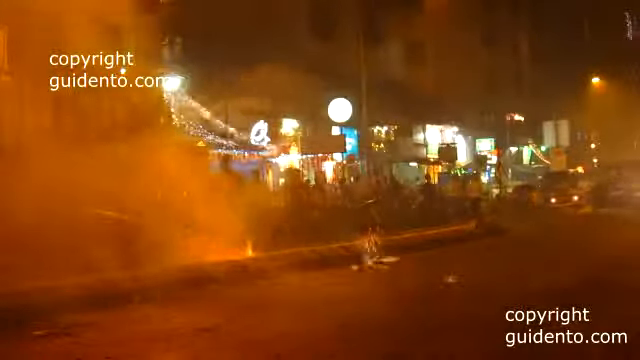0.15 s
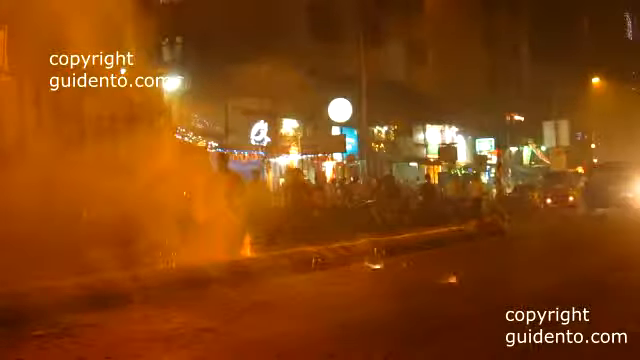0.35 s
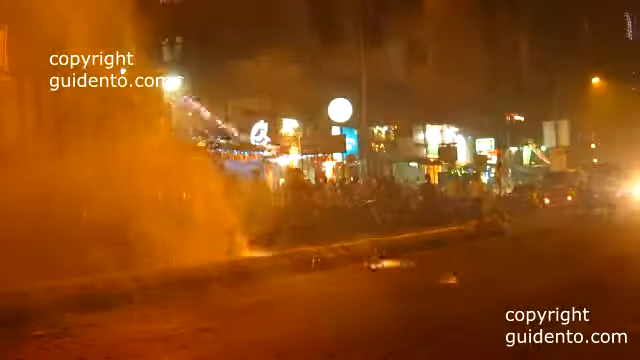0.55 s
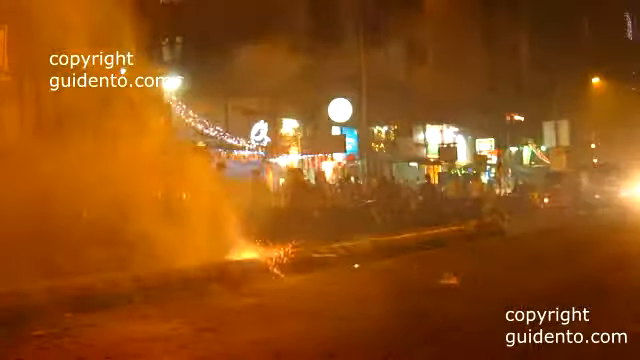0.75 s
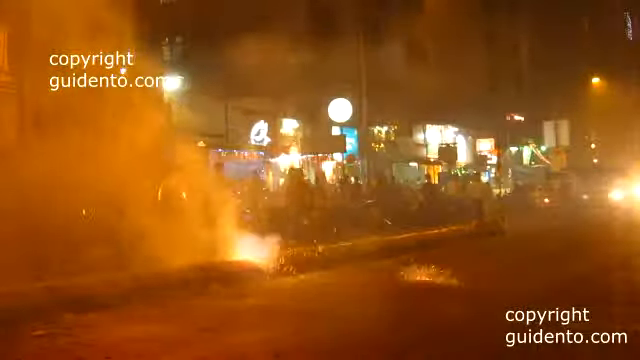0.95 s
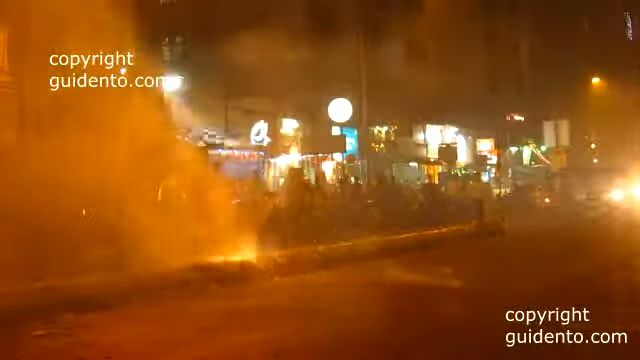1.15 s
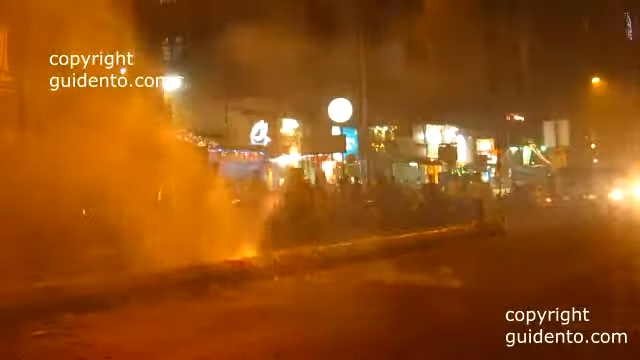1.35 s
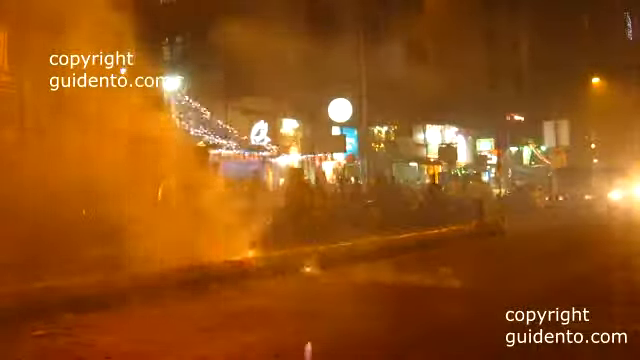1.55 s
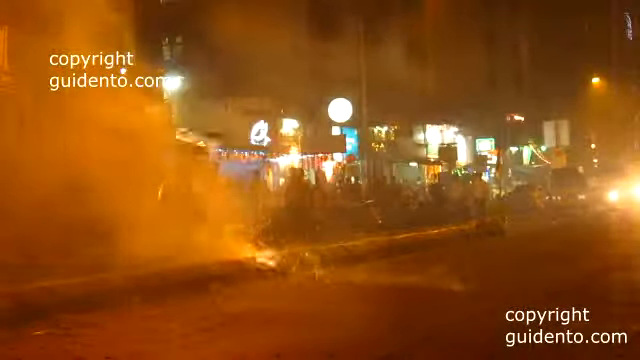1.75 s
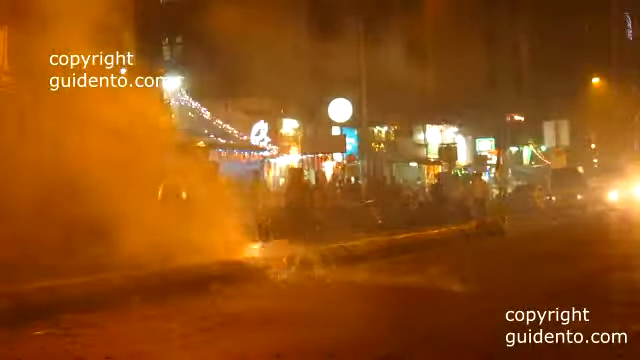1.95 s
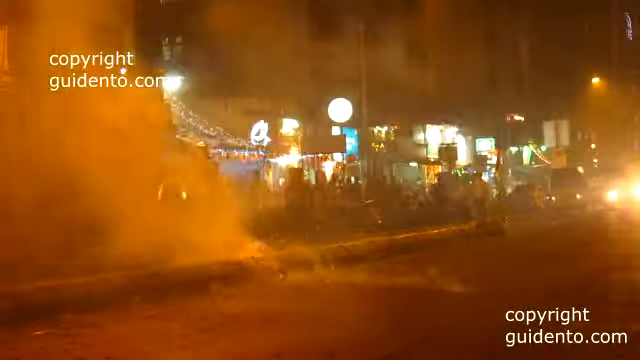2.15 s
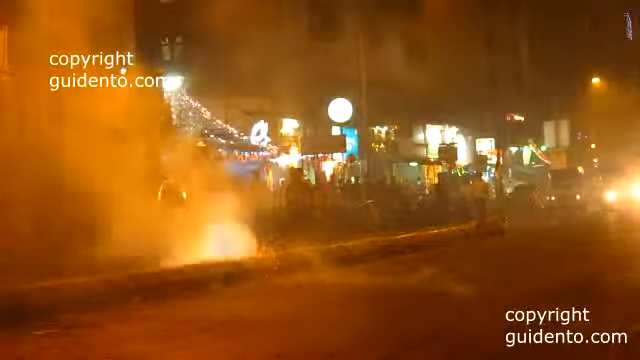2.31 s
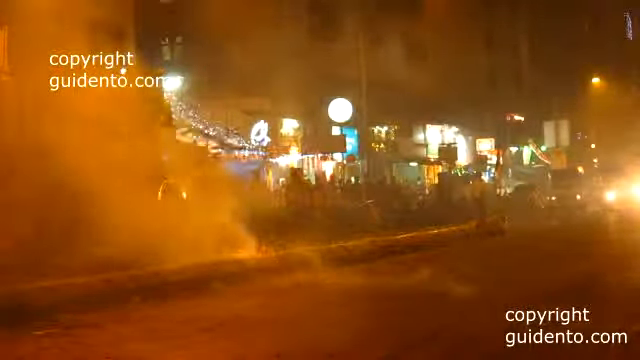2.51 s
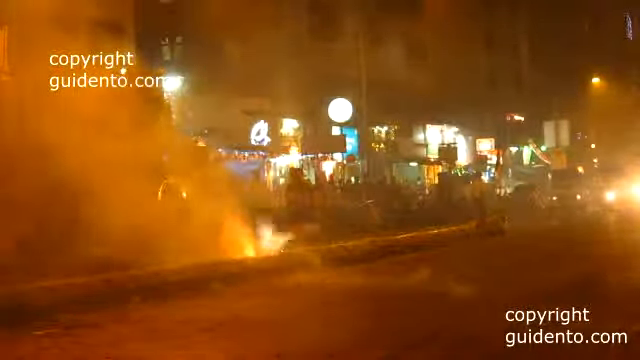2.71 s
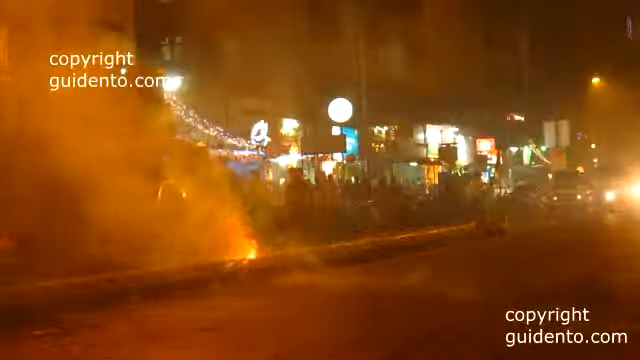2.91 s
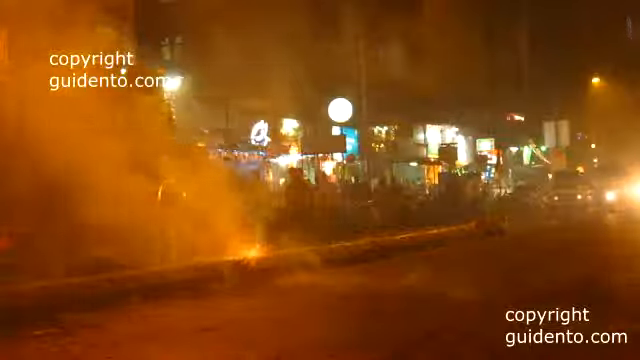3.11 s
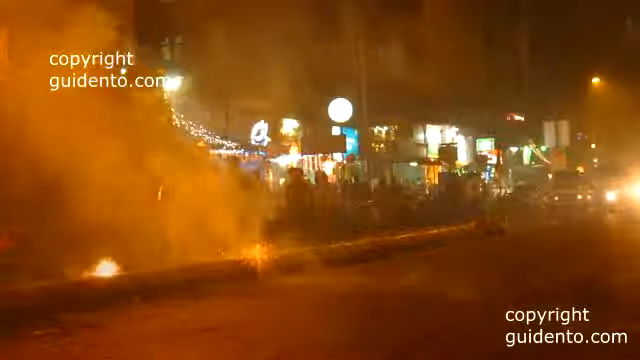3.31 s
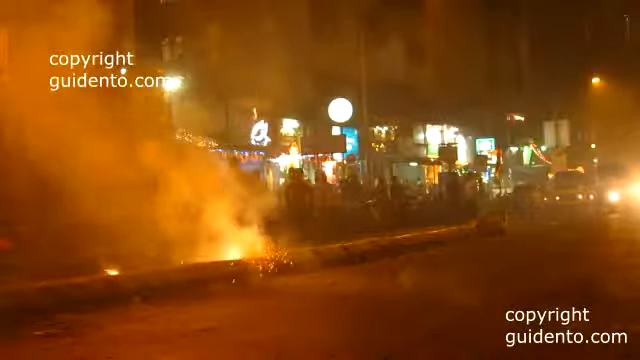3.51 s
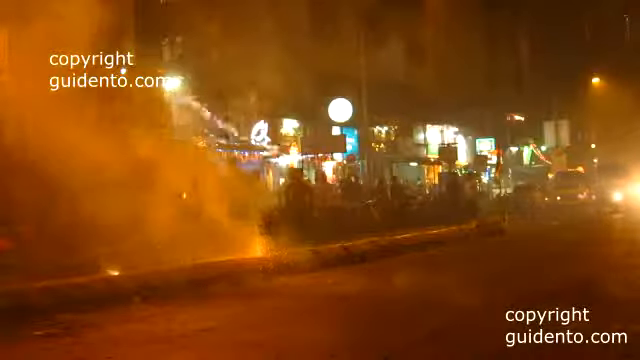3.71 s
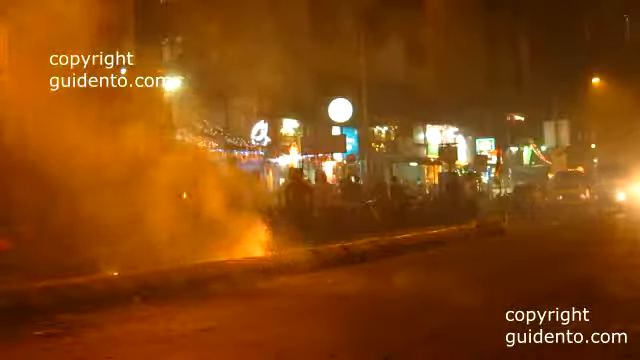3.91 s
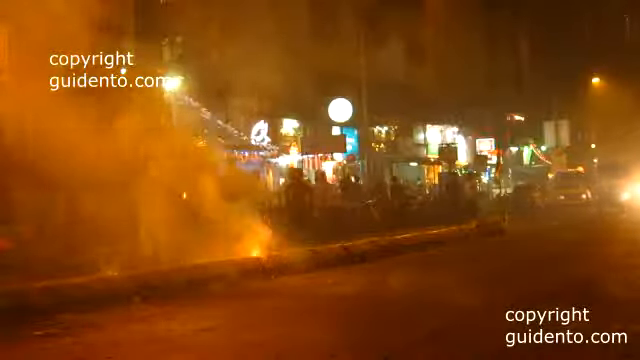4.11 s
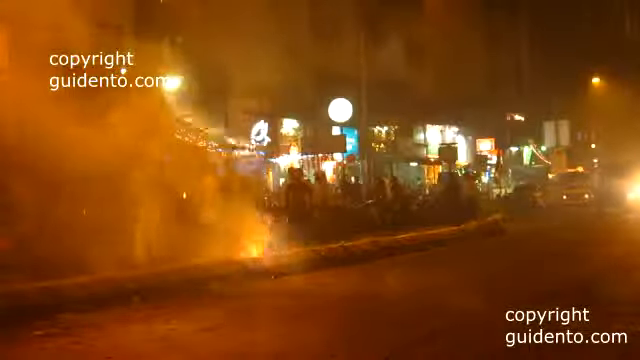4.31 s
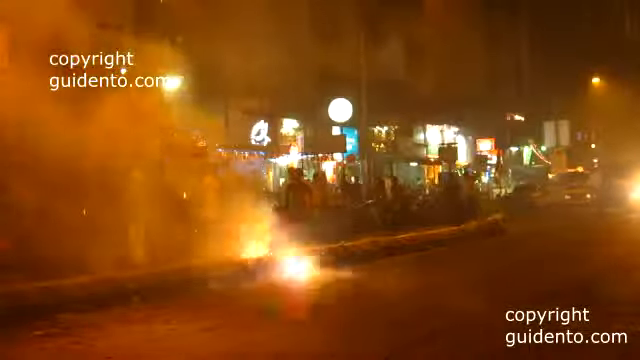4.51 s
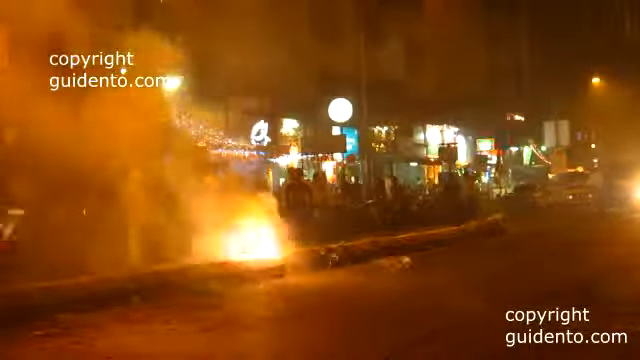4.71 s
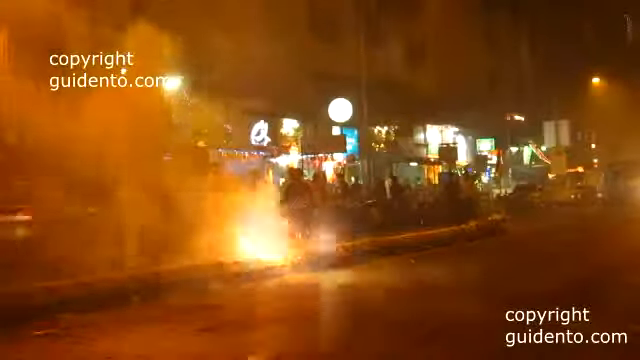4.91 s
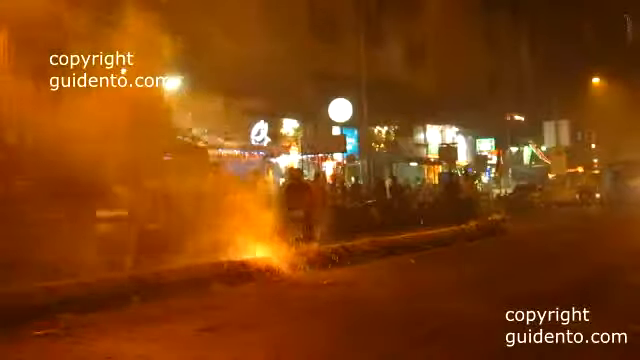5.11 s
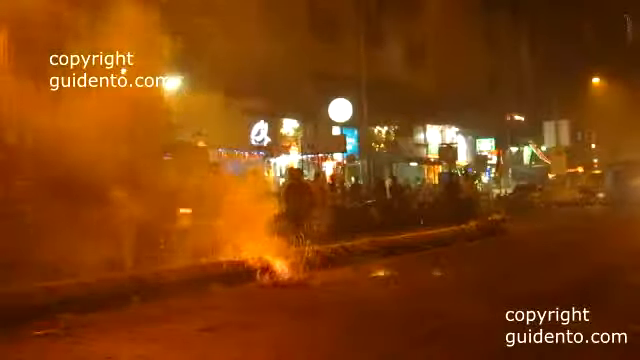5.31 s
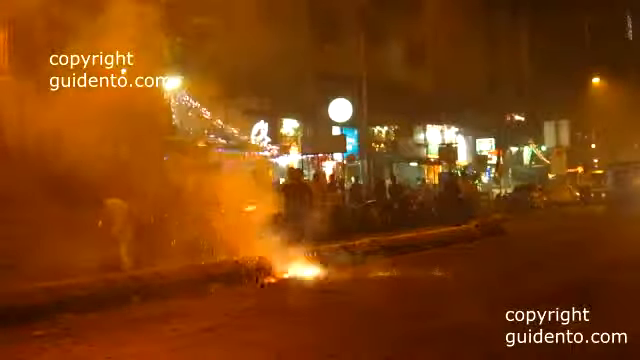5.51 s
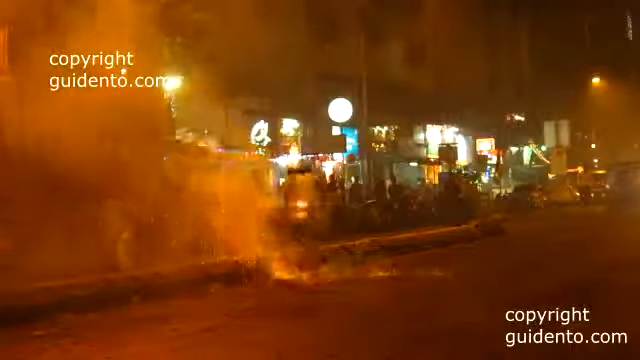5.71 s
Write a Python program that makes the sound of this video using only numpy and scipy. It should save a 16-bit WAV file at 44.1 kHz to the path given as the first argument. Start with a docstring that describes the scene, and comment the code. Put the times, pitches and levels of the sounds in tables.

```python
"""A paved street at night: a long string of firecrackers burns, its small pops merging into a rattling roar.
Bigger crackers go off among them, each a blast wave scattered by kerb and house fronts.
A low rush swells early on, and a faint hum lies underneath.
The small microphone overloads on every big bang and is dull above 3 kHz."""
import sys
import numpy as np
from scipy import signal
from scipy.fft import rfft, irfft, next_fast_len
from scipy.io import wavfile

SR = 44100
rng = np.random.default_rng(int(sys.argv[2]) if len(sys.argv) > 2 else 0)


def unload_audio(sound):
    """Save the sound as a 16-bit wav file, at the path given as the first command line argument."""
    columns = np.transpose(np.atleast_2d(sound))
    # keep every value between -1 and 1, then stretch to whole-number steps
    steps = np.round(np.clip(columns, -1, 1) * 32767)
    wavfile.write(sys.argv[1], SR, steps.astype(np.int16))


N = 253575
TIME = np.arange(N) / SR

# tone of the deep rumble: (frequency [Hz], relative level [dB])
RUMBLE_EQ = [(20, -13.5), (50, -2), (90, 3), (140, -5.5), (250, -17.5), (1000, -50)]
# tone of the low rush: (frequency [Hz], relative level [dB])
RUSH_EQ = [(25, -20.5), (55, -19), (110, -5.5), (170, -2), (260, -0.5), (430, -0.2), (600, -11),
           (1000, -8.5), (3000, -45)]
# hollow body of a bursting charge: (frequency [Hz], relative level [dB])
BODY_EQ = [(25, -25), (55, -26), (110, -18), (180, -14), (260, -3.5), (390, -3.5), (530, 0.2), (750, 1.26),
           (1000, 2.5), (1250, -2), (1550, -19), (2500, -38.5), (6000, -39)]
# bright crack of its shock front: (frequency [Hz], relative level [dB])
CRACK_EQ = [(300, -39), (1000, -13.5), (1500, 3), (2000, 4.5), (2800, 6.5), (3400, 1.5), (4500, -4.5),
            (7000, -10), (10000, -10)]
# swells of the low rush: (start [s], end [s], level [dB], rumble level [dB])
RUSH_CUES = [(0.206, 0.81, -47, -55.5), (3.03, 3.106, -62, -59)]
# stretches of crackle that fade away, or duck abruptly after the sharp bangs near 2.18 s and 4.82 s:
# (start [s], end [s], level [dB], crack offset [dB], fade-out [dB/s])
CRACKLE_CUES = [(-.1, .03, -51.5, -5, 15), (0.198, 0.412, -51, -5, 9.5), (.85, 1.964, -50.5, -4.5, 45),
                (1.98, 2.164, -55.5, -5, 198), (2.42, 2.7, -48.5, -8, 30), (2.76, 4.13, -50.5, -4.5, 13),
                (4.22, 4.42, -51.5, -2.5, 50), (4.42, 4.812, -51.5, -9, 119),
                (4.942, 5.75, -50.5, -4.5, 30)]
# big crackers: (time [s], level [dB], time for the tail to fall 60 dB [s], crack offset [dB],
# thump offset [dB])
BANG_CUES = [ (.003, -37.5, 0.15, -3.5, -13), (0.812, -36, 0.34, -6.5, -4), (.942, -39, 0.07, -12, -13),
             (.986, -39.5, 0.16, -3.5, -10), (1.047, -35.5, 0.23, -7.5, -17), (1.117, -45.5, 0.22, 1.5, 5),
             (1.3, -36.5, 0.21, -9, -21), (1.407, -38, 0.26, -13, -12), (1.57, -35.5, 0.19, -7.5, -11),
             (1.666, -39, 0.16, -4.5, -21), (1.788, -34.5, 0.052, -16, -28), (1.815, -38, 0.13, -8, -19),
             (1.985, -38, .045, -10.5, -22), (2.014, -46, 0.17, -15, -20), (2.176, -44.5, 0.0087, -13, -6),
             (2.386, -33, 0.14, -16, -24), (2.41, -38.5, .26, -11.5, -24), (2.698, -35.5, 0.4, -8, -2),
             (2.796, -42, 0.21, -3.5, -10), (3.106, -34.5, .18, -15, -14), (3.121, -35, 0.38, -10, -10),
             (3.273, -36.5, 0.083, -20, -14), (3.316, -42, 0.19, -4.5, -12), (3.355, -36, 0.19, -15.5, -14),
             (3.389, -36, 0.29, -8.5, -20), (3.479, -38, 0.36, -8, -11), (3.608, -38, 0.18, -13.5, -6),
             (3.643, -43, 0.15, -12, -20), (3.907, -36, 0.34, -9, -4), (4.103, -34, .06, -24, -13),
             (4.161, -41, 0.24, -4, -4), (4.433, -35, 0.12, -23, -7), (4.46, -37, 0.18, -16.5, -24),
             (4.617, -38, 0.076, -14.5, -21), (4.823, -39, 0.025, -13.5, -10), (4.9062, -37, .21, -5, -5),
             (5.012, -39, 0.15, -5, -17), (5.04, -34, 0.35, -7.5, -25), (5.089, -44.5, 0.36, -2.5, 1),
             (5.347, -39, 0.34, -10, -11), (5.609, -37.5, 0.06, -13, -9), (5.627, -41.5, 0.16, -3.5, -13)]
# narrow resonances around the microphone: (frequency [Hz], width [Hz], level [dB])
MIC_RESONANCES = [(384, 14, -12.5), (546, 36, -7), (733.5, 42, -8.5), (1750, 17, -2.5)]
# dull response of the microphone: (frequency [Hz], gain [dB])
MIC_EQ = [(1000, -1.5), (2000, 0.5), (3000, -2), (4000, -8), (5000, -12.5), (6300, -20), (8000, -25),
          (9300, -28), (10500, -37)]


def from_db(db):
    """Decibels to gain."""
    return 10 ** (np.asarray(db) / 20)


def rms_one(x):
    """Scale to rms 1."""
    return x / np.sqrt(np.mean(x ** 2) + 1e-20)


def eq_gains(eq, size):
    """An EQ curve as one gain for each FFT bin."""
    hz, db = np.transpose(eq)
    bin_hz = np.maximum(np.arange(size // 2 + 1) * SR / size, 1)
    return from_db(np.interp(np.log(bin_hz), np.log(hz), db))


def colour(x, eq, size=4096):
    """Shape a white signal and keep its power; minimum phase leaves no ringing ahead of an attack."""
    cepstrum = irfft(np.log(eq_gains(eq, size)))
    cepstrum[1:size // 2] *= 2
    cepstrum[size // 2 + 1:] = 0
    impulse = irfft(np.exp(rfft(cepstrum)))
    return signal.fftconvolve(x, impulse / np.sqrt(np.sum(impulse ** 2)))[:N]


def resonate(x, hz, width_hz):
    """Two-pole resonance with gain 1 at its peak."""
    radius = np.exp(-np.pi * width_hz / SR)
    feedback = [1, -2 * radius * np.cos(2 * np.pi * hz / SR), radius ** 2]
    return signal.lfilter(np.array([1, 0, -1]) * (1 - radius ** 2) / 2, feedback, x)


def clicks(per_s, spread_db):
    """Random impulses of uneven size and either sign; rms 1."""
    sizes = from_db(spread_db * np.clip(rng.standard_normal(N), -2, 2)) * rng.choice([-1, 1], N)
    return rms_one((rng.random(N) < per_s / SR) * sizes)


def street_hum(hum_hz=147.6, hum_db=-75, waver_hz=5, waver_rad=1.0, rumble_db=-76):
    """The bed: a faint wavering hum over a low rumble, perhaps idling traffic."""
    waver = signal.sosfilt(signal.butter(2, waver_hz, fs=SR, output="sos"), rng.standard_normal(N))
    hum = rms_one(np.sin(2 * np.pi * hum_hz * TIME + waver_rad * rms_one(waver)))
    return from_db(hum_db) * hum + from_db(rumble_db) * colour(rng.standard_normal(N), RUMBLE_EQ)


def low_rush(peak_share=.4, sag_db=-2.5, release_s=.023, deepening=1.1):
    """A dull turbulent rush that swells, sags a little and deepens as it ends."""
    rush_gain, rumble_gain = np.zeros((2, N))
    for start, end, db, rumble_db in RUSH_CUES:
        progress = np.clip((TIME - start) / (end - start), 0, 1)
        swell = np.interp(progress, [0, peak_share, 1], [0, 1, from_db(sag_db)])
        release = np.exp(-np.maximum(TIME - end, 0) / release_s)
        rush_gain += from_db(db) * swell * release
        rumble_gain += from_db(rumble_db) * progress ** deepening * release
    rush, rumble = rng.standard_normal((2, N))
    return rush_gain * colour(rush, RUSH_EQ) + rumble_gain * colour(rumble, RUMBLE_EQ)


def air_blast(body, crack):
    """Voice impulses as bursting charges: a hollow midrange body and the crack of the shock front."""
    return colour(body, BODY_EQ) + colour(crack, CRACK_EQ)


def crackle_envelopes(attack_s=.051, dulling_db_per_s=5.5, floor_db=-58.5, floor_crack_db=-7.5):
    """Each stretch rises, holds, then fades away or ducks abruptly, down to a quiet background crackle."""
    body_gain, crack_gain = from_db(floor_db), from_db(floor_db + floor_crack_db)
    for start, end, db, bright_db, fade_db_per_s in CRACKLE_CUES:
        since_end = np.maximum(TIME - end, 0)
        gain = np.clip((TIME - start) / attack_s, 0, 1) * from_db(db - fade_db_per_s * since_end)
        body_gain = np.maximum(body_gain, gain)
        crack_gain = np.maximum(crack_gain, gain * from_db(bright_db - dulling_db_per_s * since_end))
    return body_gain, crack_gain


def cracker_string(pops_db=-7.5, wash_db=1.8, pop_crack_db=1.5, wash_crack_db=-.97,
                   echo_s=.0043, echo_db=-7):
    """A rattle of small pops, each with a first reflection, over the duller wash of their echoes."""
    body_gain, crack_gain = crackle_envelopes()
    direct = clicks(per_s=130, spread_db=2)
    echo = from_db(echo_db) * np.interp(TIME - echo_s, TIME, direct, left=0)
    pops = from_db(pops_db) * (direct + echo)
    wash = from_db(wash_db) * clicks(per_s=7000, spread_db=2.5)
    crack = from_db(pop_crack_db) * pops + from_db(wash_crack_db) * wash
    return air_blast(body_gain * (pops + wash), crack_gain * crack)


def snaps(snap_db=12, tear_db=-13, tear_s=.009, low_cut_hz=2400):
    """The attack of each big bang: a thin shock that scales with its crack, and a spray of torn paper."""
    track = np.zeros(N)
    age = TIME[:SR // 40]
    for time_s, db, _, bright_db, _ in BANG_CUES:
        snap = from_db(tear_db) * rng.standard_normal(len(age)) * np.exp(-(age / tear_s) ** 2)
        snap[0] = 1  # the shock
        start = round(time_s * SR)
        track[start:start + len(age)] += from_db(db + bright_db + snap_db) * snap
    return signal.sosfilt(signal.butter(2, low_cut_hz, "high", fs=SR, output="sos"), track)


def big_crackers(shock_db=22, kerb_s=.0049, scatter_db=-1.5, ground_db=5, ground_s=.0046,
                 wall_s=.037, wall_spread_s=.011, wall_db=1.5, slap_db=-5,
                 crack_db=2, dulling_db_per_s=6, thump_s=.003, thump_db=2):
    """Each bang: a shock, slaps off kerb and houses, a tail of reflections and a thump of expanding gas."""
    reflections = clicks(per_s=3000, spread_db=4)
    body, crack, thumps = np.zeros((3, N))
    for time_s, db, t60, bright_db, push_db in BANG_CUES:
        kerb_jitter, wall_jitter = rng.uniform(-1, 1, 2)
        start = round(time_s * SR)
        age = TIME[:min(N - start, SR // 2)]
        span = slice(start, start + len(age))
        loss_db_per_s = 60 / max(t60, .01)
        # nearby ground answers first and hardest
        tail = from_db(scatter_db - loss_db_per_s * age + ground_db * np.exp(-age / ground_s))
        # the house fronts answer a moment later; a short bang hardly reaches them
        wall_gain = from_db(wall_db - loss_db_per_s * wall_s)
        wall_bloom = wall_gain * np.exp(-((age - wall_s) / wall_spread_s) ** 2 / 2)
        bang = reflections[span] * np.hypot(tail, wall_bloom)
        kerb_lag = round(kerb_s * (1 + .2 * kerb_jitter) * SR)
        wall_lag = round((wall_s + wall_spread_s * wall_jitter / 2) * SR)
        bang[[0, kerb_lag]] += from_db(shock_db)  # the shock and its equally loud kerb echo
        bang[wall_lag] += wall_gain * from_db(shock_db + slap_db)
        body[span] += from_db(db) * bang
        # the treble dies sooner on the longer paths
        crack[span] += from_db(db + bright_db + crack_db - dulling_db_per_s * age) * bang
        thump = np.sin(np.pi * age / thump_s) * np.exp(-age / thump_s)  # overpressure, then suction
        thumps[span] += from_db(db + push_db + thump_db) * thump
    return air_blast(body, crack) + thumps


def scene():
    """The street mixed to mono, with a narrow ringing around the microphone."""
    street = big_crackers() + snaps() + cracker_string() + low_rush() + street_hum()
    ringing = sum(from_db(db) * resonate(street, hz, width_hz) for hz, width_hz, db in MIC_RESONANCES)
    return (street + ringing)[None]


def record(dry, low_cut_hz=45, overload_db=-35, hardness=2.88, high_cut_hz=10300):
    """The microphone loses the deepest bass and overloads; its dull top rounds the flattened peaks."""
    thin = signal.sosfilt(signal.butter(2, low_cut_hz, "high", fs=SR, output="sos"), dry)
    drive = np.abs(thin / from_db(overload_db))
    clipped = thin / (1 + drive ** hardness) ** (1 / hardness)
    size = next_fast_len(2 * N)
    dull = irfft(rfft(clipped, size) * eq_gains(MIC_EQ, size), size)[:, :N]
    return signal.sosfilt(signal.butter(16, high_cut_hz, fs=SR, output="sos"), dull)


dry = scene()
out = record(dry)
unload_audio(out)
```